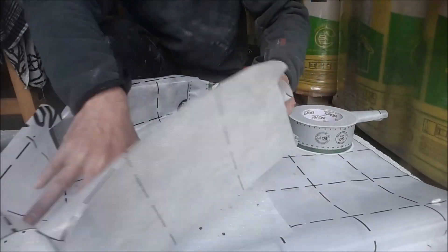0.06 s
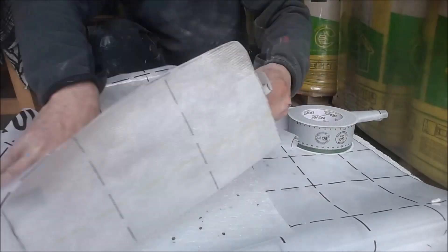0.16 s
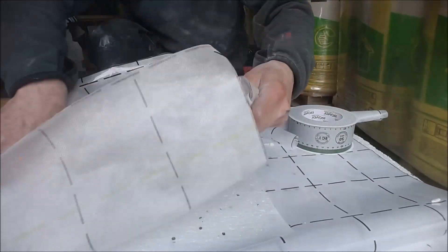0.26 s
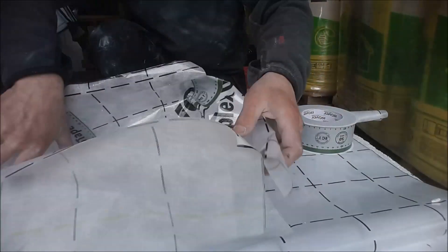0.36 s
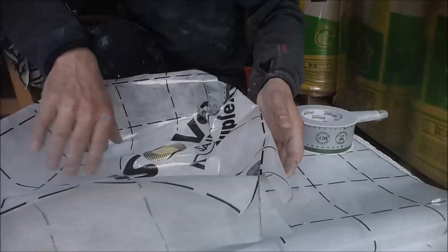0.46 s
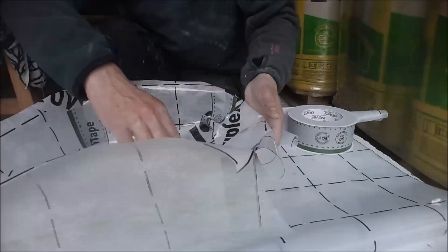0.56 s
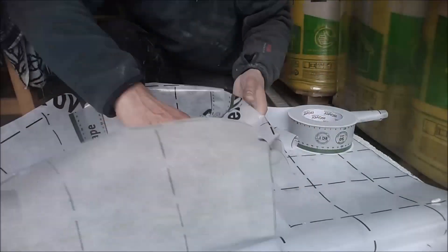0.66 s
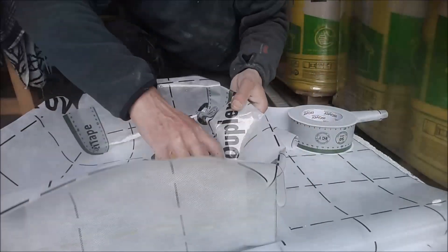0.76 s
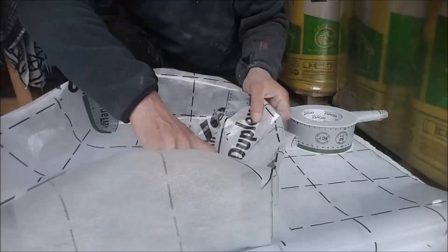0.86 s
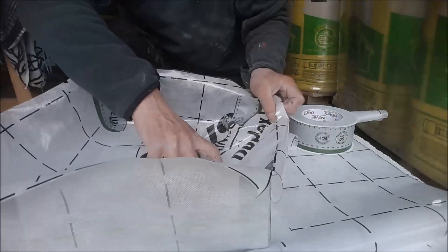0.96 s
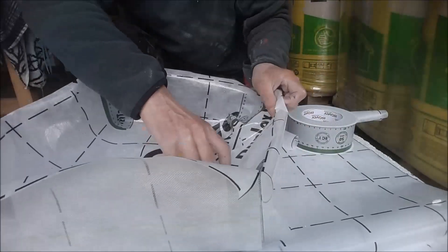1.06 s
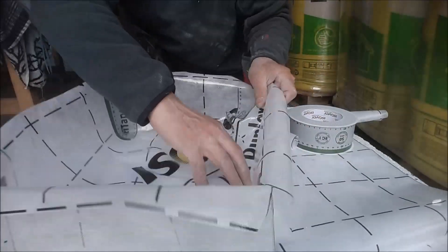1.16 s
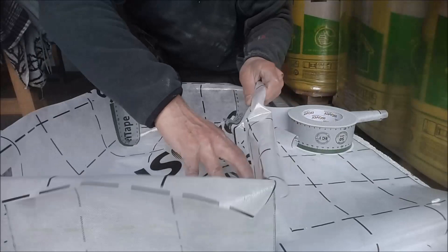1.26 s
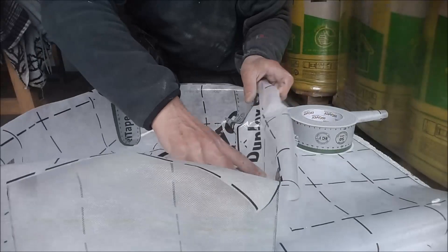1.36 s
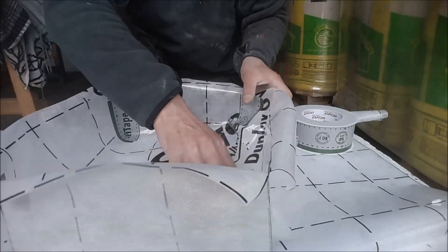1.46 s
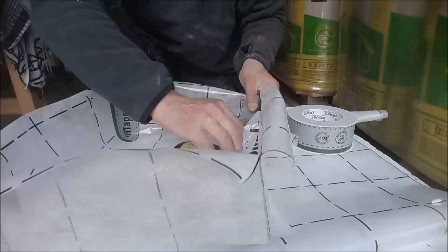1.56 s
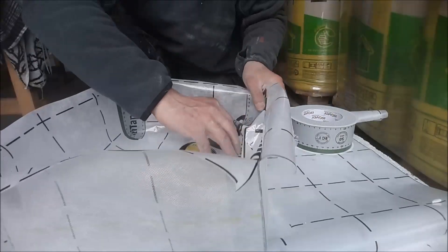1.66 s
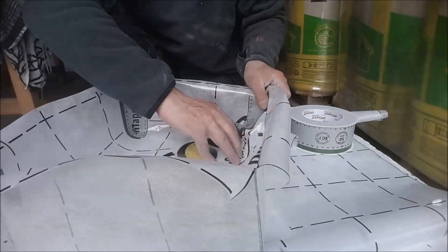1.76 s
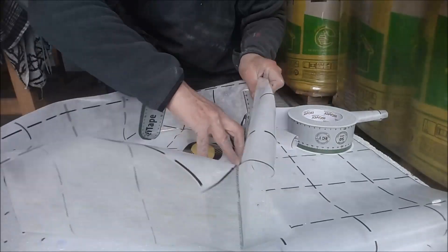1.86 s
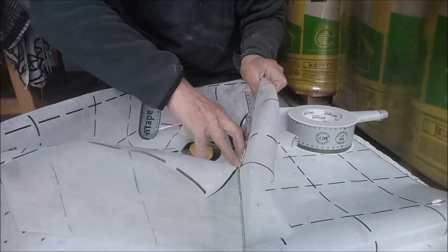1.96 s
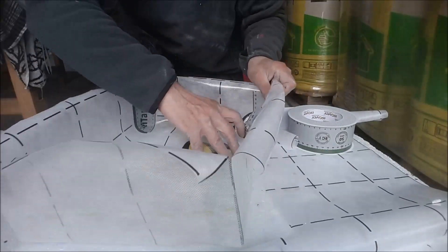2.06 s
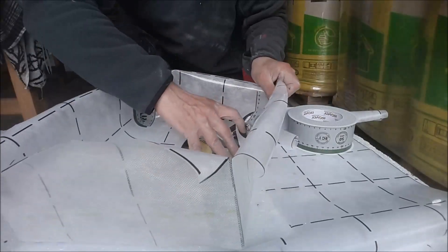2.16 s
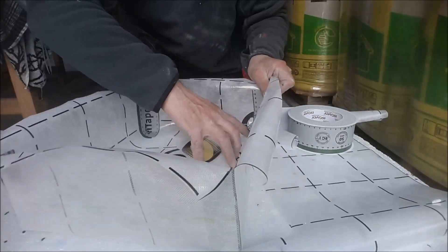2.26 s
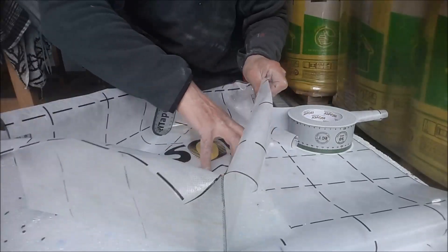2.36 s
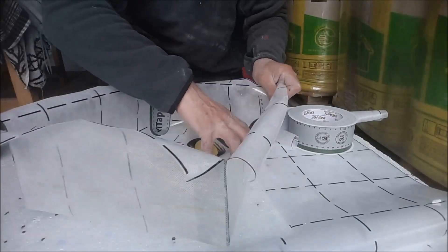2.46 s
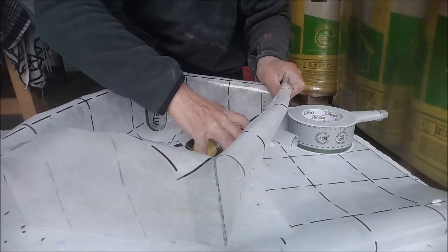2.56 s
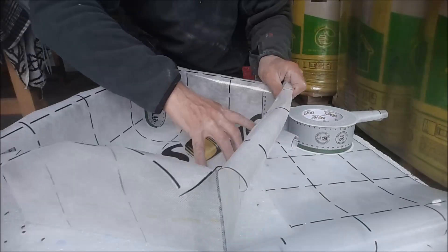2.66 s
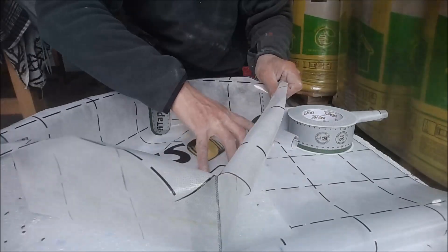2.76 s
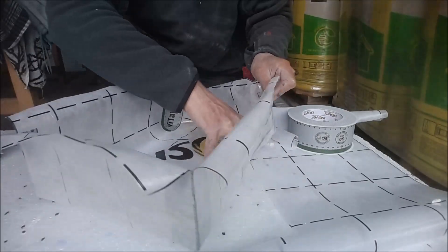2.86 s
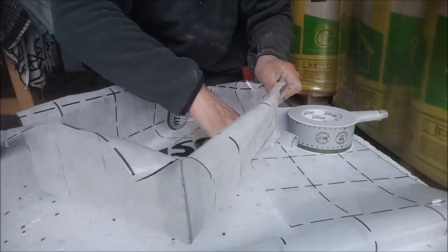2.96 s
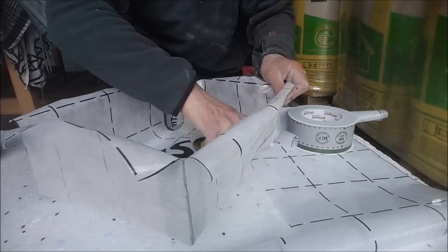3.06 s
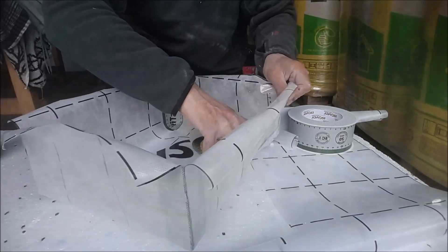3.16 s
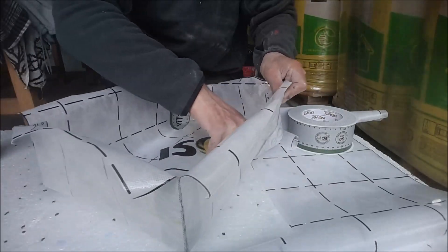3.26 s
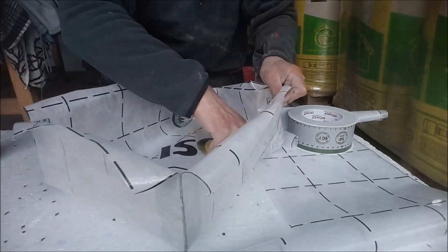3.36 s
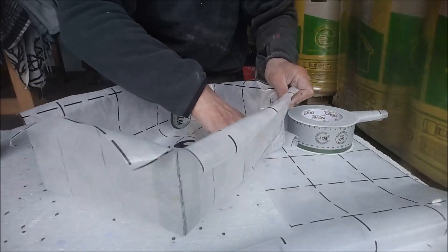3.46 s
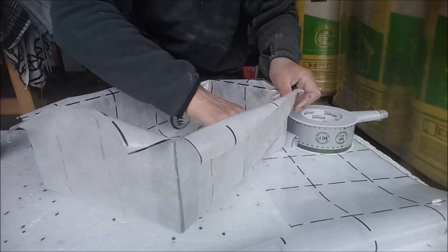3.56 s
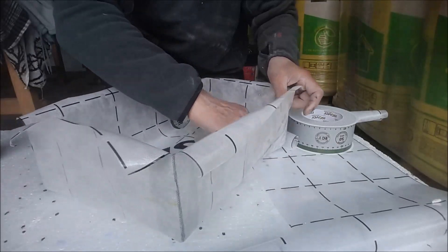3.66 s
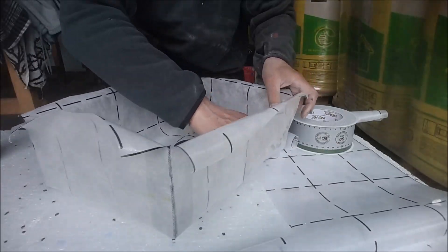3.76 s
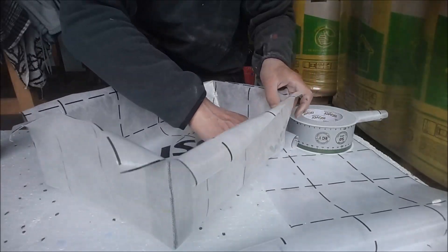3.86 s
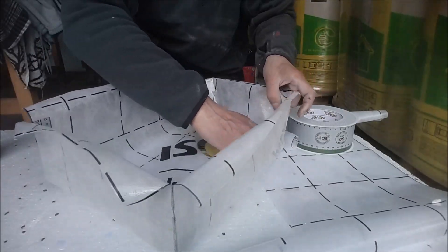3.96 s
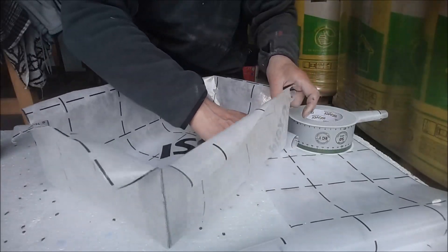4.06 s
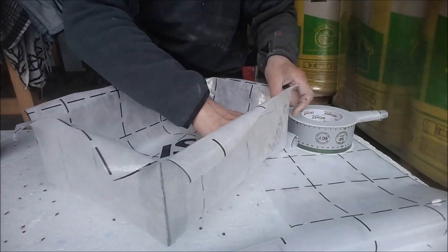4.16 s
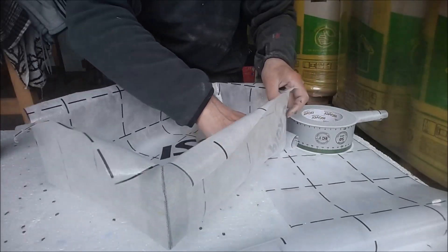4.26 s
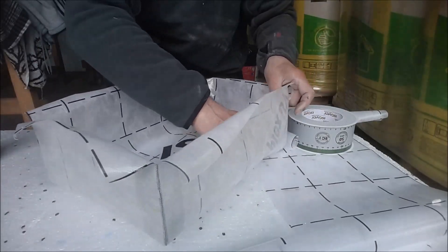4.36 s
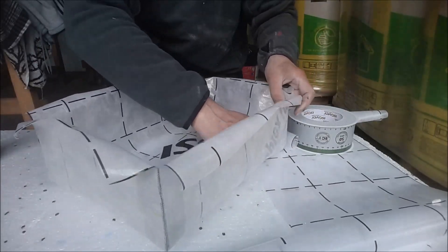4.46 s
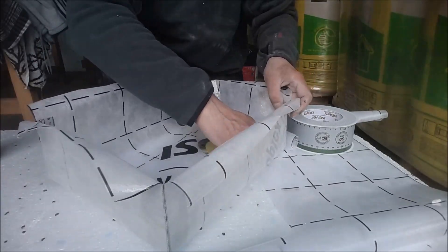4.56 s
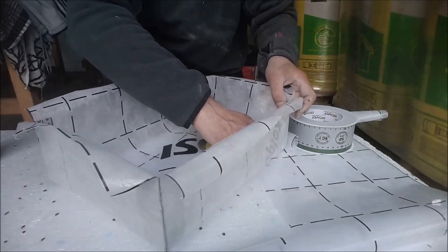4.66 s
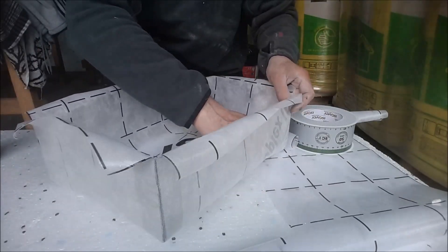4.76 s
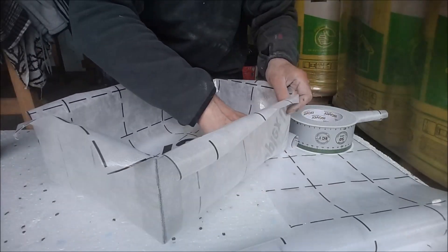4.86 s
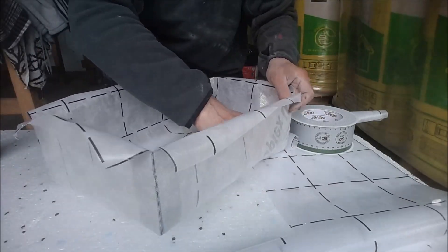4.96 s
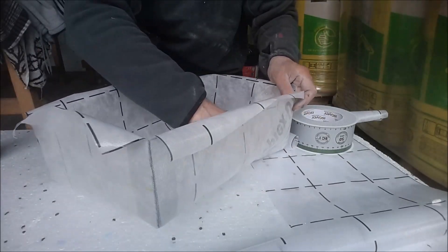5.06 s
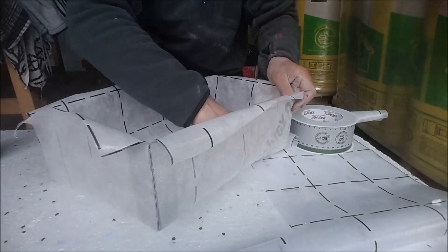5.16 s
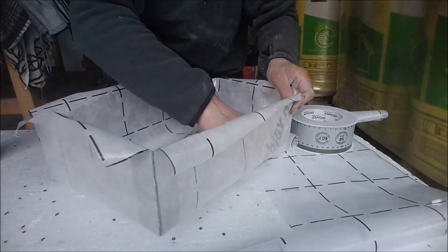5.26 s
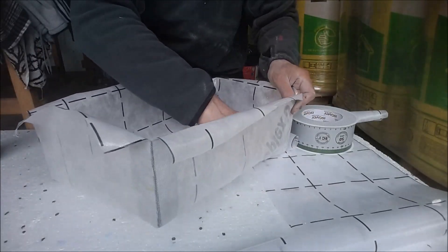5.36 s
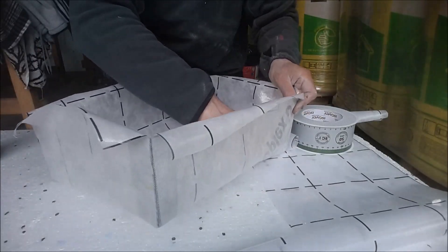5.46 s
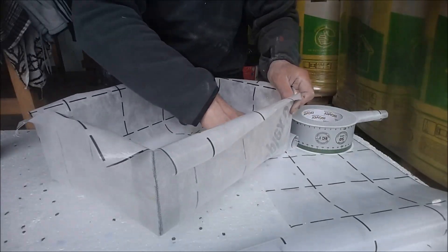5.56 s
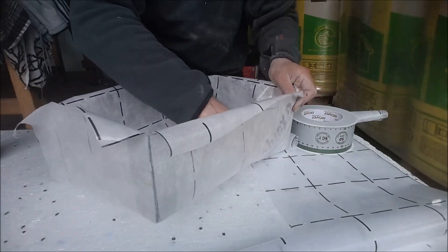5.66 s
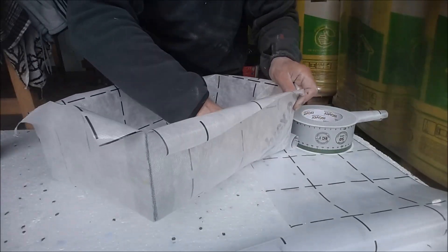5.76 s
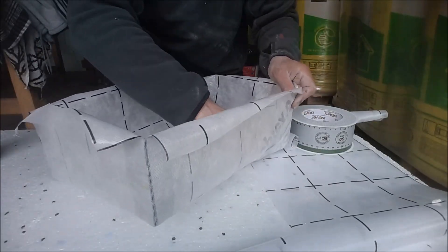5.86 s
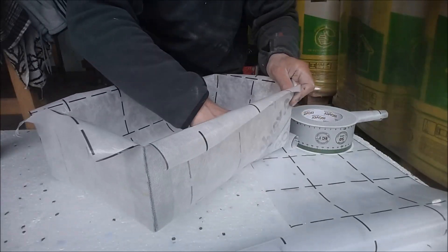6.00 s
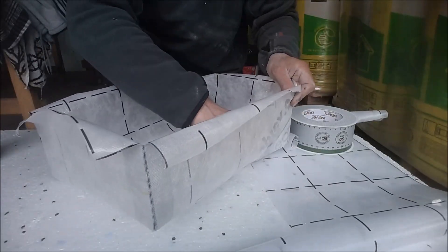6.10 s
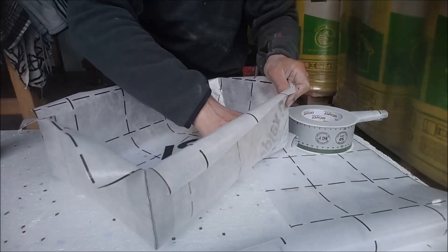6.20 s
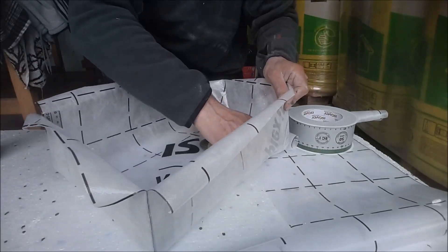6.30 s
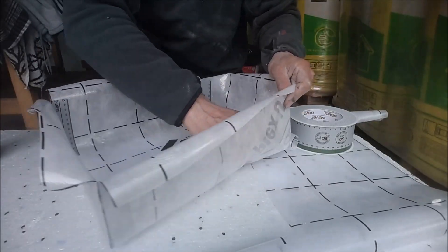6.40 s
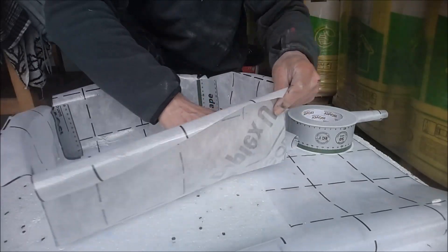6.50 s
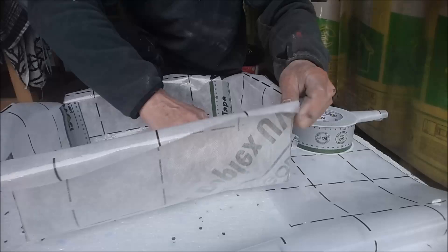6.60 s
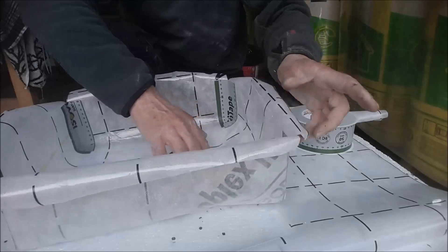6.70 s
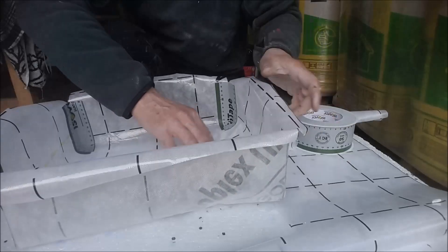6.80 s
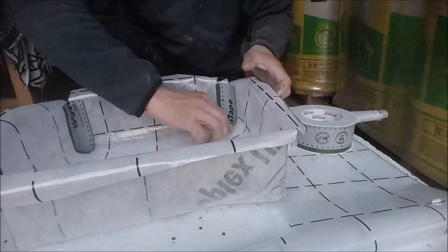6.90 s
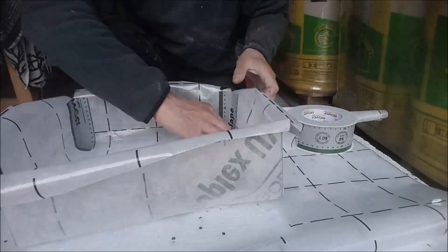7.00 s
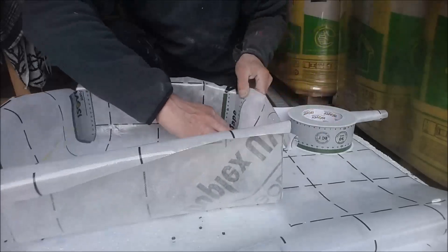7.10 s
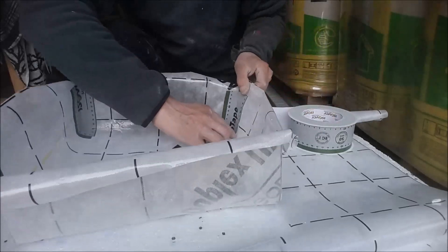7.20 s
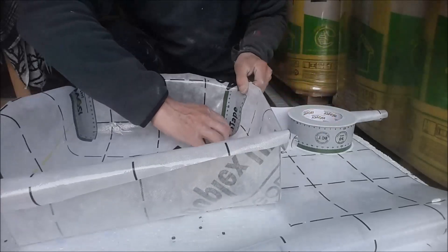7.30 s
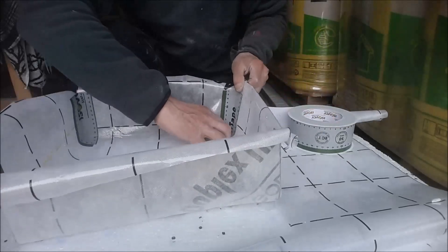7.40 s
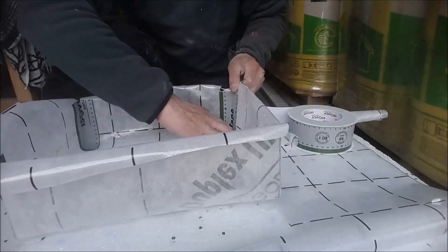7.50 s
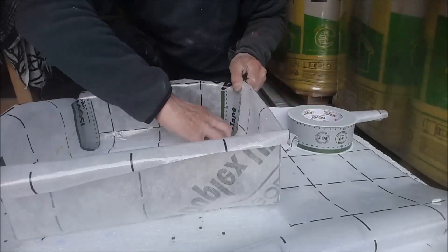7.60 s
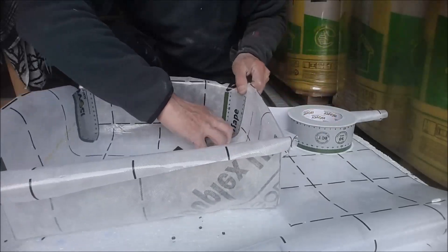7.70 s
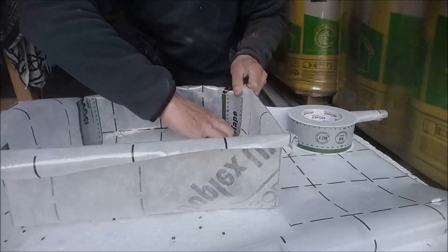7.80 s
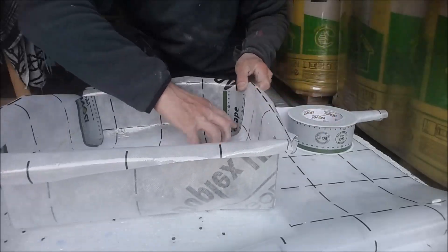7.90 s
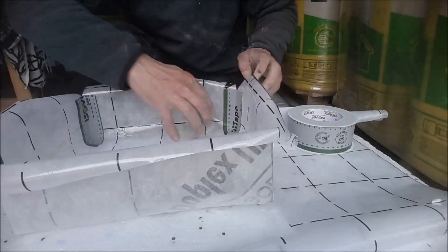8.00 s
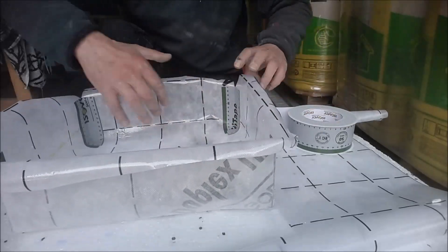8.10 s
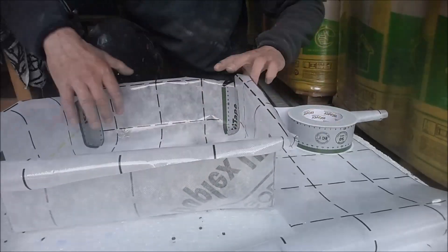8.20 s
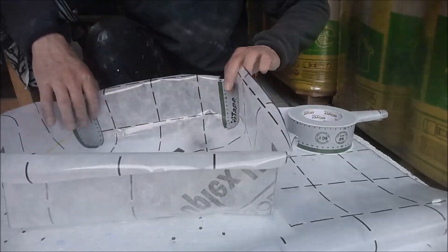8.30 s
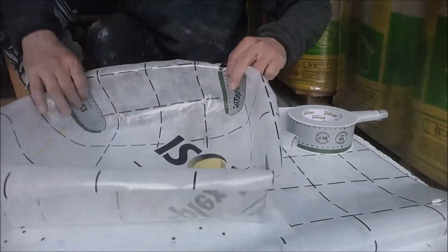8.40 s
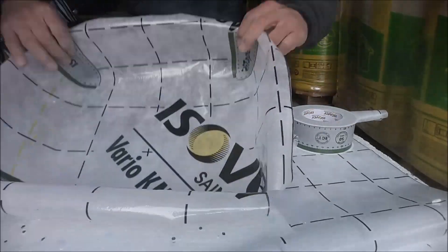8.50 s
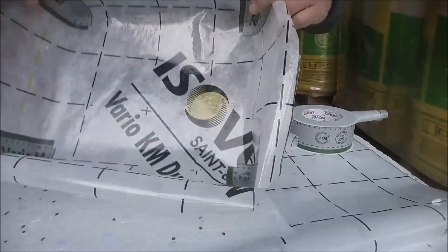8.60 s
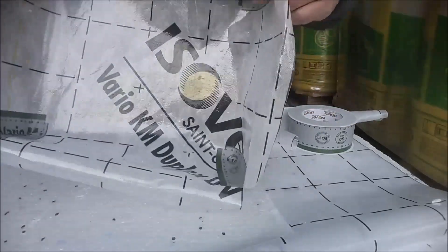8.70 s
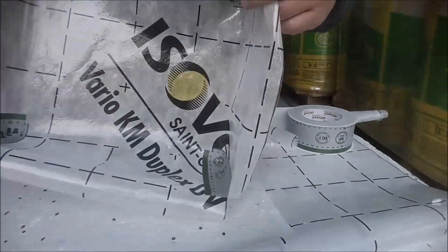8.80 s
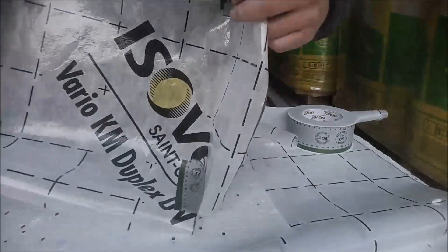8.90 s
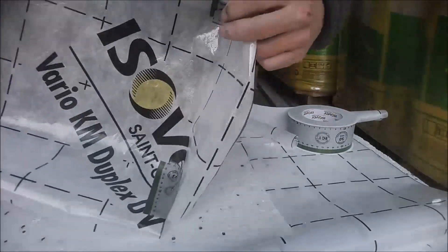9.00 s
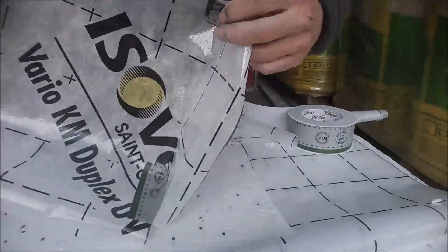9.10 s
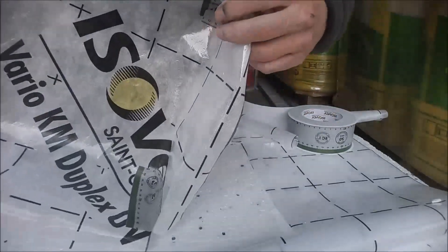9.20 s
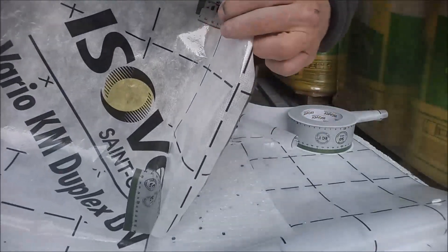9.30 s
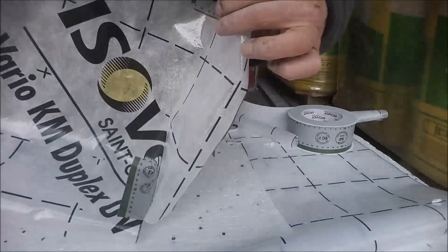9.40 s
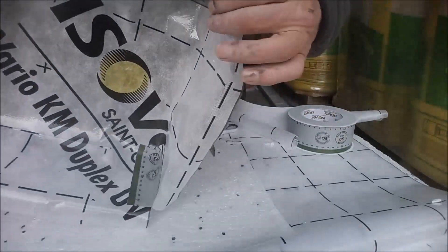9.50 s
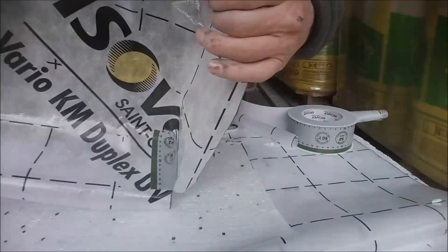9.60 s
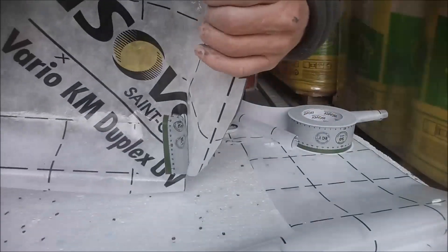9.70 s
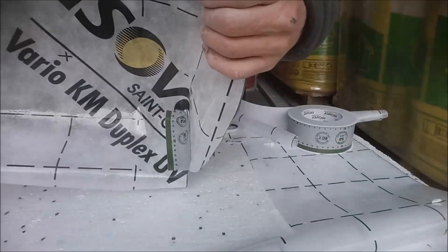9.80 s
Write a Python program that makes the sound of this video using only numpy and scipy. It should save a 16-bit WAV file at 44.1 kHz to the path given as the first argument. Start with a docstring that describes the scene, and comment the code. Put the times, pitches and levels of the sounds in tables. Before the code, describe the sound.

Close stereo sound of hands folding a stiff plastic sheet into a tray on a bench in a small, fairly dry workshop. From 0 to 1.4 seconds, sharp snaps come fast and unevenly over bright hissing rustle and dense crackle, with an especially strong burst near 1.0. After a brief easing, hard crinkles return around 1.9 and a tight cluster of pops near 2.3. From 2.5 to 4.6 rustling swells are lighter, with separate cracks and tiny ticks. From 4.7 to 6.3 it is sparser and softer, with small dull pops. A bright slide brushes past at 6.5, then stronger, hollow low snaps at 7.1 to 7.3, 7.9 and 8.1. Around 8.5 the broad sheet flops with a soft low puff. Quiet rustle fades, with a few small pops near 9.3, leaving faint room rumble and hiss.

```python
"""Creasing a stiff plastic tray

Two hands turn and crease a stiff plastic sheet, folded into an open tray, on a bench in a small workshop.
Sharp snaps are short noise pushes that flutter through the sheet; between them it hisses as it slides,
with fine crackle and lone ticks, all made from filtered noise. Decaying tones make the ringing walls and dull flops,
a short echo and tail make the room, and faint noise lies behind. Two close microphones hear it in stereo.
"""
import sys
import numpy as np
from scipy import signal
from scipy.fft import rfft, irfft, next_fast_len
from scipy.io import wavfile
from scipy.ndimage import uniform_filter1d

SR = 44100
rng = np.random.default_rng(int(sys.argv[2]) if len(sys.argv) > 2 else 0)


def persist_wave(psi):
    """Save psi, clipped to +-1, as 16-bit WAV."""
    counts = np.round(np.clip(psi, -1, 1) * 32767).astype(np.int16)
    wavfile.write(sys.argv[1], SR, np.atleast_2d(counts).T)


N = 434370
TIME = np.arange(N) / SR

# the loud buckles: (time [s], strength [dB], body: how much of the sheet moves [dB],
# edge: how sharp the crease is [dB], resonance of the flat patch [Hz])
LOUD_BUCKLES = [(0.0353, 8.5, 0, -11, 785), (0.0911, 10, -7, -6, 1730), (0.1339, 7, 13.5, 4, 2597),
                (0.1956, 8, 7, 11, 895), (0.2826, 0, -5.5, -7.5, 1600), (0.469, 0.5, -3, 0.5, 3630),
                (0.501, 0, 10, 3.5, 874), (0.5774, -2, -16.5, -3.5, 650), (0.7443, -5, 3, 4, 1950),
                (0.7613, -4.5, -15, -1.5, 2030), (0.7932, 4, 10, 1.5, 1003),
                (0.8663, 10, -10.5, -1.5, 4340), (0.94, -5.5, -7.5, 8.5, 1570),
                (1.0006, 10.5, -21.5, 9, 294), (1.0681, 6.5, 14, 12, 1024), (1.0964, -0.5, 1, 15.5, 3140),
                (1.1666, 1, -11, 4.5, 246), (1.211, 3, -15, 1, 300), (1.235, 3, -9, 4, 285),
                (1.329, 5.5, -6.5, 7.5, 3560), (1.7049, 0.5, -5, -11, 432), (1.7195, -3, 6, -28.5, 605),
                (1.8269, 4, 0.5, -3.5, 384), (1.9117, 11, -3, 10, 810), (1.9656, 8.5, 17, 8, 970),
                (1.9997, -2, 19, 14.5, 1356), (2.1655, 8, -5.5, -8, 407), (2.2148, -1.5, 2.5, 4.5, 2290),
                (2.305, 4, 2, -10, 770), (2.3144, 10, -17.5, -32.5, 3400), (2.3222, 12, -14, -36, 3330),
                (2.344, 3, 9.5, 3, 810), (2.6476, -0.5, 3, -11.5, 1330), (2.4631, 8, 4, 5, 319),
                (2.8604, -2.5, 18, 15, 1144), (2.977, 4, -10.5, 6.5, 483), (3.0224, 2, 0, 9.5, 3900),
                (3.2342, 6, -10.5, 0, 3870), (3.3522, 3, 0.5, -10, 785), (3.3798, 3.5, -1, 8, 300),
                (3.4221, 0.5, -5.5, 7, 790), (3.5953, 7.5, -11.5, -20, 282), (3.8643, -3, -13, 8, 2740),
                (3.889, -1, 11, 13, 5100), (3.915, -3, 16, 2, 3980), (4.0025, -2, 4, 3.5, 1490),
                (4.06, -5, -6, 0.5, 1610), (4.101, 5, -10, -33, 900), (4.177, -1.5, 14, 7, 3520),
                (4.3121, 1.5, -4, -0.5, 465), (4.493, -5.5, -15.5, -11, 2400), (4.5934, 3, -12, -6, 4400),
                (4.6274, -2.5, -1, 10, 760), (4.795, -10, 14.5, -9.5, 845), (4.9339, -2, 9.5, 5.5, 445),
                (5.0904, -4.5, 13, 7, 2500), (5.1217, -2, 9.5, -29.5, 355), (5.322, -8, 2, 5, 1840),
                (5.3568, -7, 11, 8, 460), (5.4238, 4.5, 0, -30.5, 3030), (5.5176, -3, 10, -31, 2550),
                (5.6667, -3, 5, -28, 2810), (5.75, -0.5, 4, -20, 2730), (5.767, 0, 1, 2, 1660),
                (5.7834, -1, 7, -19.5, 2060), (5.8129, -3, -3, 7.5, 422), (5.998, 0, -12.5, -6.5, 250),
                (6.0744, 0.5, -3, 6.5, 342), (6.1677, -25, 5, 22.5, 4500), (6.259, -13, -5, 11, 250),
                (6.2831, -9.5, 11, 5.5, 470), (6.3724, -0.5, -7, -2.5, 513), (6.4264, 0, -8.5, -0.5, 460),
                (6.438, 1, 7, -6.5, 2340), (6.58, 4.5, -6, -1, 608), (6.7985, 3.5, -1.5, -5.5, 2240),
                (6.8189, 0.5, 0, 6, 564), (7.068, 4.5, 10.5, -4, 3600), (7.1126, 6, -9.5, -10.5, 271),
                (7.1286, 9, -7, -10.5, 296), (7.164, -1, 15.5, 8, 1390), (7.2413, 10, -21, -10, 300),
                (7.299, 8.5, -1.5, -3, 444), (7.361, 2, 1, 7.5, 1514), (7.373, -5, 18.5, 5, 2850),
                (7.579, 4, -2, -5, 550), (7.588, -1, 5, -3, 3240), (7.759, -4, 0, 11.5, 368),
                (7.7827, 0, 0, 3.5, 273), (7.8345, 8, 2, -7, 375), (7.875, 13, -14, -5.5, 286),
                (8.0843, 11, 8, -15, 412), (8.338, -13.5, 21.5, 5, 640), (8.4229, 3, 2, -4, 382),
                (8.531, 5, -13, -25, 2060), (9.2641, -9.5, 7.5, -17, 508), (9.2758, -4, -13, 6, 4110),
                (9.3784, 6.5, 7, -40, 2750)]


def amp(db):
    """Turn decibels into a gain."""
    return 10 ** (np.asarray(db) / 20)


def colour(points, hz):
    """Read the level in dB of a (frequency [Hz], level [dB]) outline at the given frequencies."""
    f, db = np.transpose(points)
    return np.interp(np.log(hz + 1), np.log(f), db)


def shape(x, points):
    """Filter a steady signal so that its levels follow an outline."""
    size = next_fast_len(N)
    gain = amp(colour(points, np.fft.rfftfreq(size, 1 / SR)))
    return irfft(rfft(x, size) * gain, size)[..., :N]


def causal(db, size):
    """Minimum-phase response with these levels: a sharp front, the ringing after it."""
    cepstrum = irfft(np.log(amp(db)))
    cepstrum[1:size // 2] *= 2
    cepstrum[size // 2 + 1:] = 0
    return np.exp(rfft(cepstrum))


def unit(x):
    """Scale to unit energy."""
    return x / np.sqrt(np.sum(x ** 2, axis=-1, keepdims=True))


def walk(rate):
    """Random wander with a spread of about 1.4: straight lines between random points, `rate` per second."""
    knots = rng.standard_normal(4096)
    return 1.66 * np.interp(TIME * rate, np.arange(len(knots)), knots)


def tone(hz, body_db, edge_db):
    """Body sets the bass, as a broad panel moves more of it; edge sets the treble, as a tight crease does."""
    body = np.interp(np.log(hz + 1), np.log([200, 1000]), [1, 0])
    edge = np.interp(np.log(hz + 1), np.log([1500, 9000]), [0, 1])
    return body * body_db + edge * edge_db


def facet(hz, facet_hz, lift_db=9, octaves=0.34):
    """The flat patch between creases has a broad resonance of its own."""
    distance = np.log2((hz + 1) / facet_hz) / octaves
    return lift_db * np.exp(-.5 * distance ** 2)


def ambience(gain_db=0):
    """Faint room rumble, shared by both microphones, under a soft hiss."""
    # workshop background: (frequency [Hz], level [dB])
    background = [(25, -62), (52, -40.5), (75, -42.5), (95, -38), (250, -46), (320, -48), (380, -45),
                  (430, -45), (700, -48), (1400, -58.5), (3000, -62), (6000, -72), (8000, -77.5),
                  (16000, -70)]
    mid, side = shape(rng.standard_normal((2, N)), background)
    side = shape(side, [(100, -12), (2000, 3)])  # the microphones differ more in the treble
    return amp(gain_db) * (mid + side * np.array([[1], [-1]]))


def hands():
    """Effort and edge over time: strokes swell and fade, and the sheet settles after each loud buckle."""
    # pushes and slides of the hands: (time of the peak [s], effort [dB], swell by 20 dB [s],
    # fade by 20 dB [s], edge: sliding is bright, bending dull [dB])
    strokes = [(0.005, -21.0, 0.055, 0.138, 1.2), (0.196, -20, 0.199, 0.199, 7),
               (0.497, -27, 0.194, 0.058, 4.5), (0.574, -32.5, 0.055, 0.066, -3.5),
               (0.771, -24.5, 0.027, 0.323, 0.86), (1.028, -12, 0.088, 0.11, 0.2),
               (1.17, -30.5, 0.041, 0.11, 8.5), (1.32, -17.5, 0.119, 0.118, 1.85),
               (1.444, -26.5, 0.088, 0.122, -1.23), (1.602, -31.5, 0.031, 0.023, -4.5),
               (1.829, -21, 0.017, 0.066, -2.5), (1.969, -13, 0.099, 0.072, -3),
               (2.113, -33, 0.127, 0.222, -0.9), (2.316, -21.5, 0.021, 0.086, -11),
               (2.423, -25.5, 0.083, 0.156, -0.59), (2.517, -22, 0.131, 0.074, -0.8),
               (2.614, -23.5, 0.066, 0.105, -3.5), (2.722, -33, 0.061, 0.134, 0.22),
               (2.868, -30.5, 0.048, 0.174, 3), (3.017, -25, 0.156, 0.059, 0.95),
               (3.153, -32, 0.092, 0.195, -1.1), (3.415, -25.5, 0.126, 0.096, 0),
               (3.609, -27.5, 0.072, 0.069, -0.06), (3.723, -41.5, 0.061, 0.114, 4.5),
               (3.884, -21.0, 0.034, 0.074, -0.09), (4.084, -31, 0.207, 0.101, -6.5),
               (4.182, -32, 0.056, 0.054, -8.5), (4.312, -35, 0.1, 0.102, -2),
               (4.497, -35.0, 0.04, 0.102, 0.39), (4.606, -28.5, 0.026, 0.084, -3.5),
               (4.798, -39.5, 0.048, 0.135, 1.5), (4.9, -38, 0.073, 0.071, -3.5),
               (5.118, -29, 0.059, 0.073, -7), (5.325, -35.5, 0.042, 0.213, -7),
               (5.776, -26.5, 0.035, 0.089, -7.5), (5.87, -43, 0.053, 0.041, 4.5),
               (6.005, -37.5, 0.06, 0.048, -4.5), (6.374, -35.5, 0.153, 0.086, -8.5),
               (6.488, -21.9, 0.083, 0.105, 9.5), (6.638, -28, 0.076, 0.176, 6.5),
               (6.799, -26, 0.019, 0.072, -0.47), (7.128, -24.5, 0.081, 0.116, -6.5),
               (7.258, -23.0, 0.033, 0.14, -8), (7.583, -29.0, 0.098, 0.093, -6.5),
               (7.885, -27.5, 0.168, 0.062, -7), (8.021, -34.0, 0.13, 0.074, 7),
               (8.085, -25.5, 0.015, 0.074, -16.5), (8.422, -32, 0.031, 0.084, 0.83),
               (8.491, -27, 0.13, 0.167, 4.5), (8.743, -37.5, 0.233, 0.096, 1.59),
               (9.02, -38, 0.091, 0.139, 3.5), (9.229, -47, 0.223, 0.185, 6),
               (9.385, -40, 0.109, 0.154, -2.5)]
    # the sheet stirring in the grip between strokes: (time [s], effort [dB])
    hold = [(0.0, -36.0), (0.45, -38.5), (0.72, -65), (0.9, -41.5), (1.7, -41), (2.9, -52.5), (3.8, -54.0),
            (4.3, -56), (5.1, -62.5), (5.9, -53), (6.6, -50), (6.98, -62), (7.3, -52.5), (7.9, -40.5),
            (8.3, -58), (8.6, -49.5), (9.3, -54.5), (9.85, -60)]
    hold_edge_db = 3
    # rustle around a buckle: level against its strength, rise and fall by 20 dB, share of its edge
    settle_db, strain_s, settle_s, settle_edge = -40.5, 0.012, 0.09, 0.4
    swell_curve, fade_curve = 1.4, 1.1  # above 1: a rounder top, and a more abrupt start or end
    settling = [(s + .004, db + settle_db, strain_s, settle_s, settle_edge * edge_db)
                for s, db, _, edge_db, _ in LOUD_BUCKLES]
    t = np.linspace(0, N / SR, num=5000)
    power = amp(np.interp(t, *np.transpose(hold))) ** 2
    treble = power * amp(hold_edge_db)
    for s, db, swell_s, fade_s, edge_db in strokes + settling:
        before = np.maximum((s - t) / swell_s, 0) ** swell_curve
        after = np.maximum((t - s) / fade_s, 0) ** fade_curve
        stroke = amp(db - 20 * np.minimum(before + after, 10)) ** 2
        power = power + stroke
        treble = treble + stroke * amp(edge_db)
    effort_db = np.interp(TIME, t, 10 * np.log10(power))
    edge_db = np.interp(TIME, t, 20 * np.log10(treble / power))
    return effort_db, edge_db


def crackle(rate=1300, spread_db=2.0, smear_s=0.0022, facet_db=4, size=512):
    """Tiny creases give way at random, many faint and a few strong, on facets of every size."""
    facets = np.geomspace(350, 13000, num=14)  # Hz
    hz, out = np.fft.rfftfreq(size, 1 / SR), 0
    for facet_hz in facets:
        pulses = (rng.random(N) < rate / len(facets) / SR) * rng.choice([-1, 1], N)
        pulses = pulses * amp(spread_db * np.minimum(rng.exponential(size=N), 3))
        # small facets fall silent sooner
        decay = np.exp(-np.arange(size) / SR / smear_s * np.sqrt(facet_hz / 2000))
        flutter = unit(rng.standard_normal((2, size)) * decay)
        resonance = causal(facet(hz, facet_hz, lift_db=facet_db) - facet_db / 4, size)
        flutter = irfft(rfft(flutter) * resonance, size)
        out = out + signal.oaconvolve(unit(pulses)[None], flutter, axes=1)[:, :N]
    return out * np.sqrt(N / len(facets))


def ticks(rate=15, tick_db=27, spread_db=3, ring_s=0.00041, size=256):
    """Now and then a tight crease lets go alone: a thin, bright tick, about `rate` per second."""
    scatter = np.clip(rng.standard_normal(N), -2, 2)
    pulses = (rng.random(N) < rate / SR) * amp(tick_db + spread_db * scatter)
    flutter = rng.standard_normal((2, size)) * np.exp(-np.arange(size) / SR / ring_s)
    bright = unit(signal.lfilter([1, -.5], [1], flutter))
    return signal.oaconvolve(pulses[None], bright, axes=1)[:, :N]


def rustle(effort_db, edge_db, gain_db=-1, grip_db=2, flicker_db=2.5, wide_hz=2000,
           crackle_share=0.9, slide_per_db=1.14, force_per_db=0.77, lag_s=.0001):
    """Rubbing is mostly an even hiss; harder, duller bending favours crackle, whose share is kept in limits."""
    # colour of the rustle: (frequency [Hz], level [dB])
    rustle_colour = [(30, -21), (55, -6.5), (100, -0.5), (200, 0.5), (400, 2.5), (700, -3), (1400, -2),
                     (2800, -3.5), (4500, -6), (6000, -11.5), (7400, -21.5), (9000, -23.5), (11000, -20),
                     (16000, -22.5)]
    # a gentle touch sways the whole sheet, a hard one works a small patch; sliding bends it less
    body_per_db, body_even_db, body_top_db, slide_body = 0.3042, -27, 9, 0.43
    body_db = np.minimum(body_per_db * (body_even_db - effort_db), body_top_db)
    body_db = body_db - slide_body * np.maximum(edge_db, 0)
    # crackle_share is the starting point, at 0 dB of effort and edge
    share = np.clip(crackle_share + force_per_db * effort_db - slide_per_db * edge_db, .05, .95)
    source = np.sqrt(share) * crackle() + np.sqrt(1 - share) * rng.standard_normal((2, N))
    # lone ticks stand out while the hands move gently
    source = source + ticks() / (1 + amp(effort_db + 18.5))
    size = next_fast_len(N)
    hz = np.fft.rfftfreq(size, 1 / SR)
    mid, side = rfft(source, size) * amp(colour(rustle_colour, hz))
    # the two microphones agree in the bass and part in the treble; the right one hears a little later
    apart = np.clip(0.07 + 0.45 * hz ** 2 / (hz ** 2 + wide_hz ** 2), 0, 1)
    spectrum = np.sqrt(1 - apart) * mid + np.sqrt(apart) * side * np.array([[1], [-1]])
    spectrum[1] *= np.exp(-2j * np.pi * hz * lag_s)
    # the grip catches and lets go: the level wavers more where crackle has a larger share
    level_db = effort_db + gain_db + grip_db * share * walk(70)
    centres = 125 * 2. ** np.arange(8)  # Hz; each octave band flickers by itself
    out = 0
    for centre, pick in zip(centres, np.eye(len(centres))):
        band_gain = np.interp(np.log(hz + 1), np.log(centres), pick)
        band = irfft(spectrum * band_gain, size)[:, :N]
        band_db = level_db + tone(centre, body_db, edge_db) + flicker_db * walk(35)
        out = out + band * amp(band_db)
    return out


def tray_walls(x, ring_db=-25, size=8192):
    """The upright folds, set off by snaps and rustle, ring as a few decaying tones."""
    # walls of the tray: (frequency [Hz], time to fall 60 dB [s], relative level [dB])
    wall_modes = [(162, 0.15, -21), (245, 0.42, -9), (332, 0.063, -43), (411, 0.13, 7), (440, 0.099, -74),
                  (538, 0.094, -25.5), (598, 0.012, 28.5)]
    t = np.arange(size) / SR
    ring = sum(amp(db - 60 * t / t60) * np.cos(2 * np.pi * hz * t) for hz, t60, db in wall_modes)
    return amp(ring_db) * signal.oaconvolve(x.mean(axis=0), unit(ring))[:N]


def workshop(x, echo_db=-13, echo_s=.0095, tail_db=-11, t60=0.12, size=16384):
    """One near surface throws back a quick echo; the cluttered room adds a short tail."""
    t = np.arange(size) / SR
    near, far = rng.standard_normal((2, 2, size))
    echo = unit(near * (t > echo_s) * np.exp(-abs(t - echo_s) / 0.00096))
    tail = unit(far * np.clip(t / 0.0013 - 1, 0, 1) * amp(-60 * t / t60))
    return signal.oaconvolve(x, amp(echo_db) * echo + amp(tail_db) * tail, axes=1)[:, :N]


def small_snaps(effort_db, edge_db, crowding=0.6, count=240):
    """Lesser buckles come at random, more often and stronger the harder the hands bend the sheet."""
    # strength at -32.5 dB of bending, dB per dB of bending, upper limit, scatter
    start_db, follow, top_db, spread_db = -6, 0.71, 1.5, 3
    # sharpness of small creases against the rustle, its scatter, and how much of the sheet moves
    crease_edge_db, edge_spread_db, body_db = 1, 5.5, 1
    when, facets = rng.random((count, 2)).T
    strength, edge = np.clip(rng.standard_normal((count, 2)), -2, 2).T
    bend_db = effort_db - 0.6 * np.maximum(edge_db, 0)  # sliding bends the sheet less
    # share out the buckles evenly over the bending work done
    work = np.cumsum(amp(crowding * bend_db))
    at = np.searchsorted(work, (np.arange(count) + when) / count * work[-1])
    db = np.minimum(start_db + follow * (bend_db[at] + 32.5), top_db) + spread_db * strength
    crease_db = edge_db[at] + crease_edge_db + edge_spread_db * edge
    facet_hz = 400 * (4000 / 400) ** facets  # 400 to 4000 Hz
    return list(zip(TIME[at], db, np.full(count, body_db), crease_db, facet_hz))


def snaps(buckles, gain_db=0, flutter_db=0, flutter_s=0.0019, bass_flutter_s=0.0041,
          lag_s=.0001, spread_s=0.00073, size=2048):
    """Each buckle is one sharp push, then bending waves flutter through the sheet; the long ones last longer."""
    # colour of a snap: (frequency [Hz], level [dB])
    snap_colour = [(40, -46), (100, -13), (180, -9), (360, -4.5), (700, -4), (1400, -0.5), (2800, -4.5),
                   (4500, -6), (6000, -10.5), (7400, -24), (11000, -23.5), (16000, -27)]
    # where the hands work: (time [s], left minus right [dB])
    hand_pan = [(0, -2), (1.9, -1), (3.6, 2.5), (6.4, 1.5), (7.9, 0), (9.3, -5.5)]
    pan_spread_db = 2  # buckles scatter left and right of the hands
    t, hz = np.arange(size) / SR, np.fft.rfftfreq(size, 1 / SR)
    bass = 1 / (1 + (hz / 700) ** 2)
    # bending waves are dispersive: the treble arrives first, the bass a moment later
    delay_s = spread_s / np.sqrt(1 + hz / 1000)
    dispersion = np.exp(-2j * np.pi * np.cumsum(delay_s) * hz[1])
    out = np.zeros((2, N + 2 * size))
    for s, db, body_db, edge_db, facet_hz in buckles:
        noise, place = rng.standard_normal((4, size)), rng.standard_normal()
        pan_db = np.interp(s, *np.transpose(hand_pan)) - pan_spread_db * place
        push = rfft(unit(noise[3] * np.exp(-t / 0.00039)))
        push = push / np.sqrt(uniform_filter1d(abs(push) ** 2, size=16))  # even out its spectrum
        # long waves reach both microphones alike, short ones differently
        long_waves = rfft(unit(noise[0] * np.exp(-t / bass_flutter_s))) * np.sqrt(bass)
        short_waves = rfft(unit(noise[1:3] * np.exp(-t / flutter_s))) * np.sqrt(1 - bass)
        wave = push + amp(flutter_db) * (long_waves + short_waves)
        wave = wave / np.sqrt(uniform_filter1d(np.mean(abs(wave) ** 2, axis=0), size=44))
        snap_db = colour(snap_colour, hz) + tone(hz, body_db, edge_db) + facet(hz, facet_hz)
        wave = wave * dispersion * causal(snap_db, size)
        side_db = gain_db + db + np.array([[pan_db], [-pan_db]]) / 2
        left, right = irfft(wave) * np.linspace(1, 0, size) * amp(side_db)
        # the sheet lies a little to the left, so the right microphone mostly hears it later
        start = int(s * SR)
        late = max(start + round(lag_s * SR * (1 + 0.28 * place)), 0)
        out[0, start:start + size] += left
        out[1, late:late + size] += right
    return out[:, :N]


def flops(rise_s=0.00092, size=16384):
    """A broad panel springs over and pushes a dull puff of air: a low sine that rises fast and dies away."""
    # soft flops of the tray's whole floor: (time [s], level [dB], frequency [Hz], time to fall 60 dB [s])
    floor_flops = [(6.879, -29.5, 168, 0.029), (8.486, -33, 156, 0.13), (8.5, -45, 60.4, 0.2),
                   (8.539, -32.5, 110, 0.2), (8.56, -37, 79, 0.15), (8.63, -46, 52, 0.33)]
    t = np.arange(size) / SR
    out = np.zeros(N + size)
    for s, db, hz, t60 in floor_flops:
        start = int(s * SR)
        envelope = amp(db - 60 * t / t60) * (1 - np.exp(-t / rise_s))
        out[start:start + size] += envelope * np.sin(2 * np.pi * hz * t)
    return out[:N]


def scene(rustle_room_db=-6):
    """The hands drive snaps and rustle, which sound through the tray and the room."""
    effort_db, edge_db = hands()
    rubbing = rustle(effort_db, edge_db)
    cracks = snaps(LOUD_BUCKLES + small_snaps(effort_db, edge_db))
    sheet = cracks + amp(rustle_room_db) * rubbing  # what drives the walls and the room
    return cracks + rubbing + flops() + tray_walls(sheet) + workshop(sheet) + ambience()


def record(dry):
    """Each microphone port has its own colour; a steep low-pass filter cuts the top."""
    # how much more the left microphone hears than the right: (frequency [Hz], level [dB])
    port_balance = [(250, -0.5), (550, -0.5), (1100, -0.5), (2500, 1.5), (4500, -3.5), (8000, -2.5),
                    (14000, 0.5)]
    top_hz = 16000
    ports = np.array([shape(x, [(hz, sign * db / 2) for hz, db in port_balance])
                      for x, sign in zip(dry, (1, -1))])
    return signal.sosfilt(signal.ellip(10, .2, 70, top_hz, fs=SR, output="sos"), ports)


dry = scene()
out = record(dry)
persist_wave(out)
```